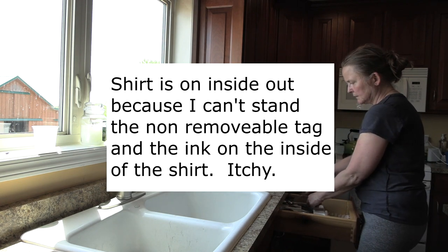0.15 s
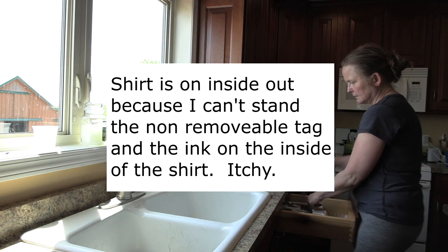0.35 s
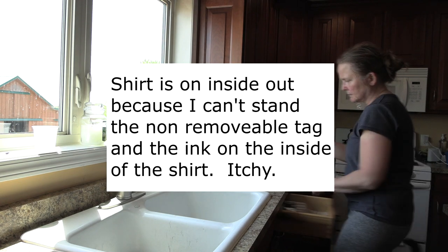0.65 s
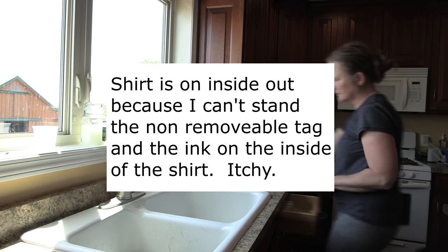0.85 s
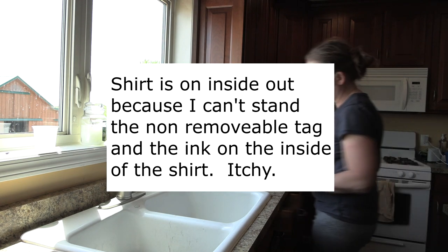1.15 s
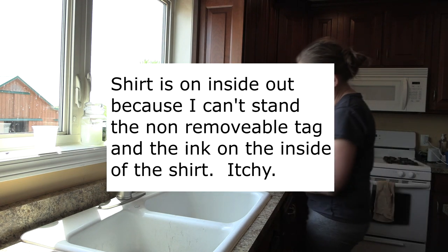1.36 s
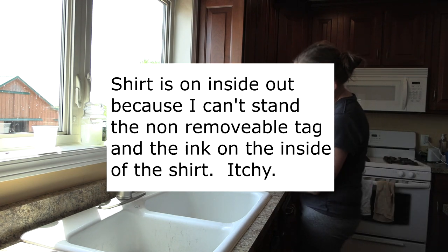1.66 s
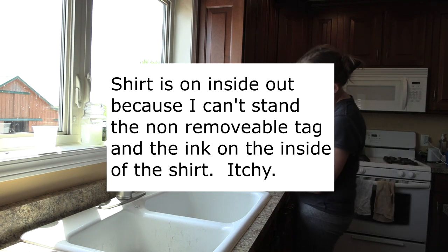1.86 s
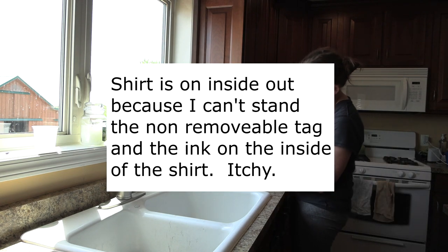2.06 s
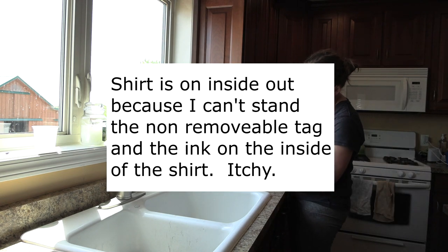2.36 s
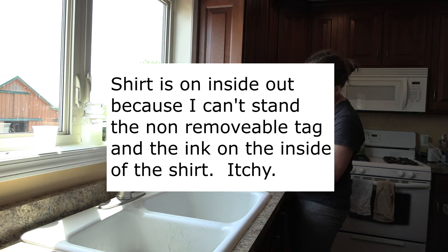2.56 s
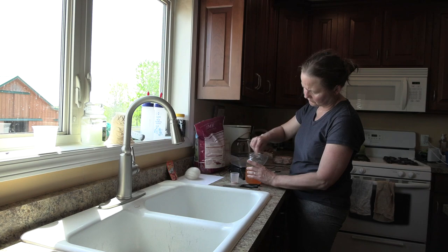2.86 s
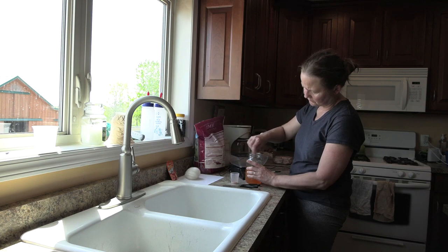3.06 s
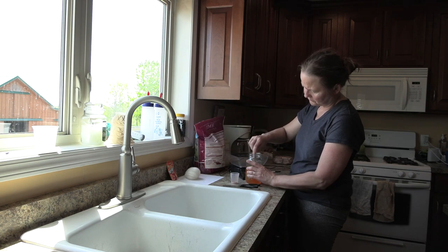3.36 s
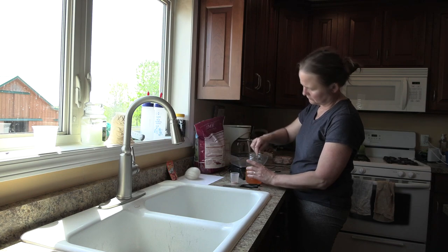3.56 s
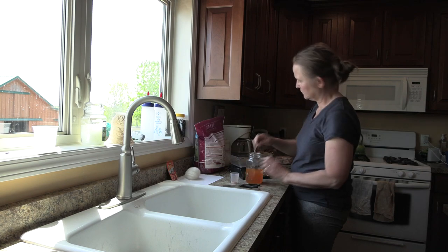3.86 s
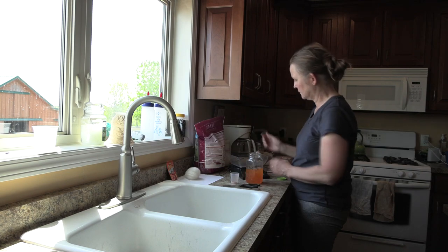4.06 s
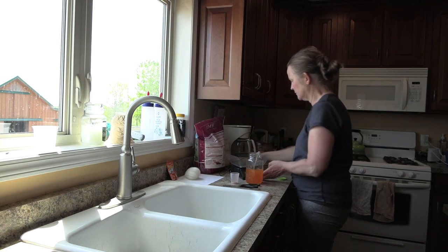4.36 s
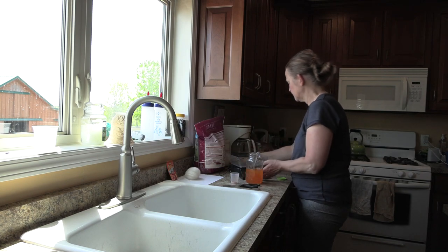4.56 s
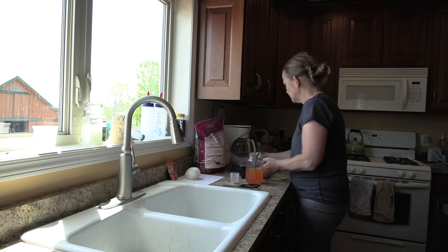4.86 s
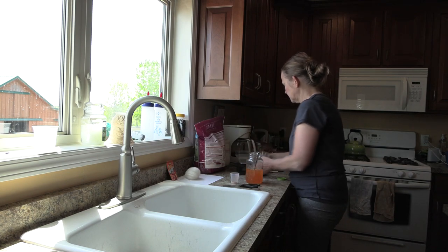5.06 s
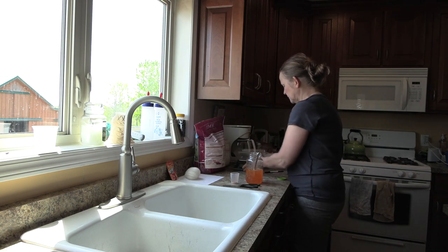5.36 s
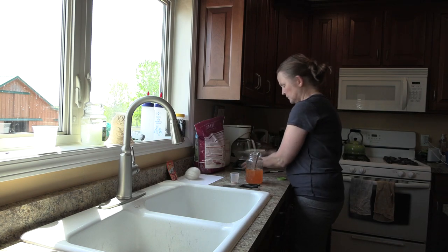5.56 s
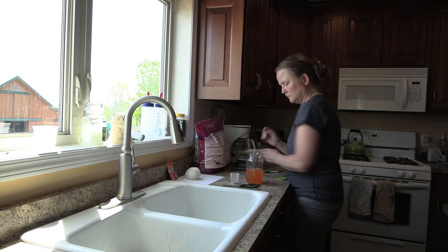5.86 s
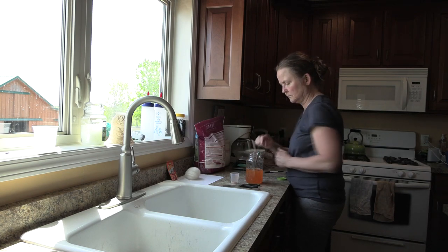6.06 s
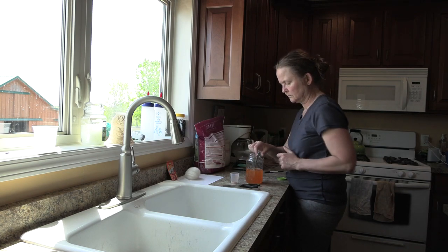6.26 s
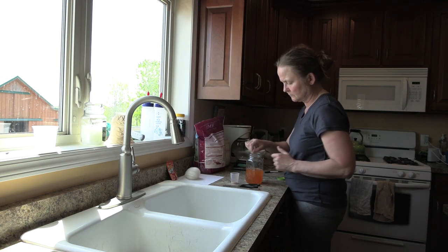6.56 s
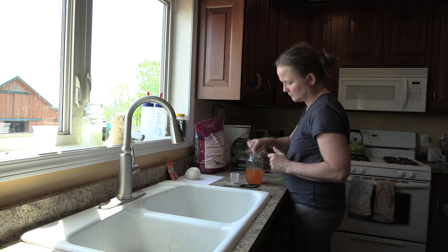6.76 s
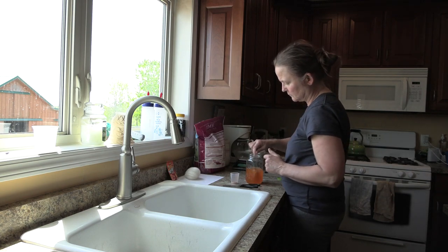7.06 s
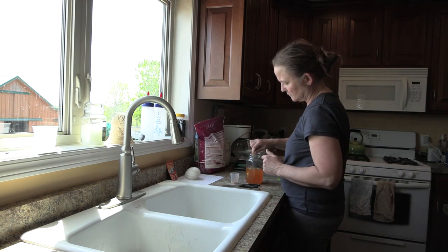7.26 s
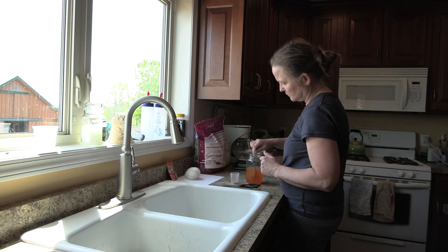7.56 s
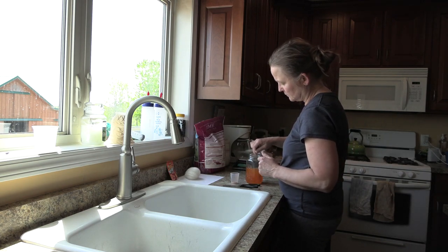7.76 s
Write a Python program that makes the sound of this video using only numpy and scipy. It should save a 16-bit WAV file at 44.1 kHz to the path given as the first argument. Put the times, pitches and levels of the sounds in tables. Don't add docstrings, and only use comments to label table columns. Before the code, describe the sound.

Kitchen counter, stereo microphone a few steps off, left side louder, faint fridge hum throughout. First come jolting forks and spoons in a wooden drawer, then low rolling and small bumps. Next, rapid uneven spoon knocks ring in a partly filled glass jar, some with tiny bounces or scrapes. After a few fading nudges a bag slides with a dry hiss and snap. A pause, one clink, then renewed bright stirring with short reverberant tails.

```python
import sys
import numpy as np
from scipy import signal
from scipy.fft import rfft, irfft, next_fast_len
from scipy.io import wavfile
from scipy.ndimage import uniform_filter1d

SR = 44100
rng = np.random.default_rng(int(sys.argv[2]) if len(sys.argv) > 2 else 0)


def transcribe(signal):
    frames = np.atleast_2d(signal).T
    limited = np.clip(frames, -1, 1)
    pcm = np.round(limited * 32767).astype(np.int16)
    wavfile.write(sys.argv[1], SR, pcm)


def undo_db(level):
    steps = np.asarray(level, float) / 20
    return 10 ** steps


N = 348831

# (frequency [Hz], level [dB])
WEAK_MODES = [(1995, -9), (2100, -5.5), (2180, -8), (2505, -20.5), (2570, -6.5), (2780, -2), (2920, -11.5),
              (3330, -23.5), (4050, -17), (4120, -5), (4510, -9.5), (4597, -6),
              (4810, -7), (4985, -4), (5120, -5), (5415, -1), (5620, -32.5), (5740, -4.5), (6340, -6.5),
               (6800, -5), (7120, -5.5), (7790, -10), (8760, -13), (9860, -20.5), (11300, -32)]
MINOR_MODES = WEAK_MODES
# (frequency [Hz], density [dB per Hz])
CRACK = [(180, -61.5), (300, -17.5), (1750, -11), (2280, -17), (2740, -7), (5570, -8.5), (9760, -23),
         (15500, -57.5)]
# (frequency [Hz], density [dB per Hz])
RATTLE = [(1060, -39), (1800, -5.5), (3180, -5), (3910, 1.5), (6180, -3.5), (8870, -1.5), (11600, -7),
          (15500, -20.5)]
# (frequency [Hz], density [dB per Hz])
WOOD = [(200, -47.5), (518, -7.5), (882, -11.5), (977, -8.5), (1520, -9), (3000, -20.5), (3900, -39),
        (6600, -120)]
# (frequency [Hz], density [dB per Hz])
RUNNER = [(59, -46), (100, -34), (291, -6), (552, -9.5), (900, -15.5), (1800, -24.5), (3900, -34.5),
          (6600, -120)]
# (time [s], blow level [dB], ring frequency [Hz], ring level [dB], overtone level [dB])
STIR = [(1.42,-33,2130,-39.5,-43.5),(1.468,-17,2150,-42,-54.5),(1.68,-37,2260,-68,-62.5),(1.735,-14,2084,-34.5,-36.5),(1.973,-19.5,2063,-37,-44),(2.058,-20.5,2106,-29.5,-30),(2.121,-15,2160,-47,-33.5),(2.179,-9.5,1960,-34,-34),(2.37,-19.5,2000,-36.5,-39),(2.504,-18,2090,-42,-54.5),(2.542,-11,1967,-36.5,-21),(2.694,-25,1996,-34.5,-37.5),(2.74,-20.5,2056,-46,-40),(2.86,-20.5,2000,-33,-33.5),(2.894,-9,1962,-30.5,-35),(3.056,-25,2004,-32.5,-34),(3.103,-22.5,1900,-36,-34),(3.258,-9,1958,-35,-33),(3.433,-27,2017,-32.5,-38),(3.487,-27.5,2080,-42,-46.5),(3.55,-20,2000,-44,-32),(3.622,-10.5,1976,-30.5,-33),(3.754,-23.5,2163,-31,-35)]
# (time [s], blow level [dB], ring frequency [Hz], ring level [dB], overtone level [dB])
AGAIN = [(4.057,-19.5,2097,-37,-48),(4.13,-27.5,2098,-32,-34),(4.245,-47,2132,-30.5,-40.5),(4.275,-38,2110,-36,-42),(4.335,-52,2105,-49,-48),(4.537,-54,2080,-61,-69),(4.647,-54,2126,-58,-67),(4.941,-30.5,2175,-46,-56),(5.067,-34.5,2130,-45,-62),(5.135,-50,2070,-53,-69),(6.566,-24.5,2094,-35.5,-33),(6.938,-52,2040,-46,-65),(6.973,-30,2120,-39,-39.5),(7.05,-16,2142,-24,-35),(7.15,-23.5,2170,-37,-41),(7.312,-21,2130,-39,-51),(7.389,-25,2078,-28,-35),(7.426,-40,2100,-40,-35),(7.469,-19.5,2103,-44,-28),(7.546,-9.5,2064,-24.5,-32),(7.76,-20,2105,-27,-35),(7.857,-13.5,2000,-32,-29)]
KNOCKS = STIR + AGAIN
CLEAR_BEND = 1.51


def evened(x):
    return x / np.sqrt(np.mean(x ** 2) + 1e-20)


def read(points, hz):
    f, value = np.transpose(points)
    return np.interp(np.log(hz + 1), np.log(f + 1), value)


def add(mix, s, sound):
    part = mix[round(s * SR):][:len(sound)]
    part += sound[:len(part)]


def coloured(x, spectrum):
    size = next_fast_len(x.shape[-1])
    gain = undo_db(read(spectrum, np.fft.rfftfreq(size, 1 / SR)))
    return evened(irfft(rfft(x, size) * gain, size)[..., :x.shape[-1]])


def level(rows, column):
    rows = np.array(rows)
    return undo_db(np.interp(np.arange(N) / SR, rows[:, 0], rows[:, column], -150, -150))


def swell(s, db, rise_db_s, fall_db_s, hold_s=0):
    t = np.arange(0, N + 64, 64)[:, None] / SR - s
    gain = undo_db(db + rise_db_s * np.minimum(t, 0) - fall_db_s * np.maximum(t - hold_s, 0)).sum(1)
    return np.repeat(gain, 64)[:N]


def grains(per_s, spread_db):
    size = undo_db(spread_db * np.minimum(rng.exponential(1, N), 4))
    return evened(size * rng.choice([-1., 1.], N) * (rng.random(N) < per_s / SR))


def resonate(x, hz, width_hz):
    r = np.exp(-np.pi * width_hz / SR)
    return evened(signal.lfilter([1], [1, -2 * r * np.cos(2 * np.pi * hz / SR), r * r], x))


def ring(hz, db, t60, rise_s=0.00085, bend=1):
    t = np.arange(0, max(t60, .01), 1 / SR)
    envelope = undo_db(db - 60 * (t / t[-1]) ** bend) * (1 - np.exp(-t / rise_s))
    return envelope * np.sin(2 * np.pi * hz * t)


def cluster(hz, db, t60):
    ratios = 1 + 0.008 * rng.uniform([.4, -1], [1, -.4])
    neighbours = sum(ring(hz * ratio, db - 3.5, t60, bend=CLEAR_BEND) for ratio in ratios)
    return ring(hz, db, t60, bend=CLEAR_BEND) + neighbours


def burst(spectrum, db, t60):
    t = np.arange(3000) / SR
    envelope = undo_db(db - 60 * t / t60) * (1 - np.exp(-t / 0.0021)) ** 2
    return envelope * coloured(rng.standard_normal(len(t)), spectrum)


def pair(a, b):
    # (frequency [Hz], left-right likeness [0..1])
    likeness = [(60, 1), (180, 0.86), (550, 0.97), (1650, 0.88), (4970, 0.69), (15000, 0.47)]
    size = next_fast_len(len(a))
    same = np.clip(read(likeness, np.fft.rfftfreq(size, 1 / SR)), 0, 1)
    right = irfft(same * rfft(a, size) + np.sqrt(1 - same ** 2) * rfft(b, size), size)
    return np.array([a, right[:len(a)]])


def air():
    # (frequency [Hz], level [dB], width [Hz])
    hum = [(120, -63.5, 1.5), (278.7, -53, 5.4)]
    # (frequency [Hz], density [dB per Hz])
    room_tone = [(69, -22.5), (110, -10.5), (260, -3.5), (700, -12), (2000, -25.5), (8000, -36),
                 (13500, -47.5), (15800, -69)]
    a, b = rng.standard_normal((2, N))
    motor_hz, motor_db, _ = hum[0]
    steady = np.sqrt(2) * undo_db(motor_db) * np.sin(2 * np.pi * motor_hz * np.arange(N) / SR)
    waver = sum(undo_db(db - 10.5) * resonate(a, hz, width) for hz, db, width in hum)
    return undo_db(-53.5) * coloured(pair(a, b), room_tone) + steady + waver


def drawer():
    # (frequency [Hz], width [Hz], level [dB])
    chimes = [(3780, 33, 10), (4740, 53.4, 1), (5940, 98, 10), (7240, 89, 6.5), (8730, 40, -1),
              (9450, 38, -1), (11220, 42, -4)]
    # (time [s], rattle level [dB], wooden rumble level [dB])
    jolts = [
        (0,-31.5,-35),
        (.065,-30,-41),
        (0.107,-30.5,-42),
        (0.188,-22.5,-39),
        (0.226,-43,-31.5),
        (0.264,-29.5,-26.5),
        (.38,-48.5,-65.5),
    ]
    # (time [s], level [dB])
    bumps = [
        (.58,-51.5),
        (.7,-55),
        (.81,-60),
        (.92,-49),
        (1.04,-43.5),
        (1.19,-52.5),
        (1.41,-49),
    ]
    ticks = coloured(grains(6000, 2.0), RATTLE)
    chime = sum(undo_db(db) * resonate(grains(30, 3.8), hz, width) for hz, width, db in chimes)
    rattle = evened(ticks) + undo_db(-13) * evened(chime)
    rumble = coloured(grains(400, 1.0), WOOD)
    roll = coloured(grains(400, 0.91), RUNNER)
    s, rattle_db, rumble_db = np.transpose(jolts)
    shaken = swell(s, rattle_db, 462, 431.5) * rattle + swell(s, rumble_db, 462, 431.5) * rumble
    rolling = swell(*np.transpose(bumps), rise_db_s=143, fall_db_s=121) * roll
    return undo_db(-3) * shaken + undo_db(-2.5) * rolling


def cutlery():
    # (time [s], level [dB], frequency [Hz])
    pings = [(.08,-30,11330),(.082,-35,2890),(0.099,-26,8720),(.1,-33,12300),(.12,-33,3860),(.128,-31,8750),(0.175,-25.5,4770),(.18,-28,11250),(.185,-28,3830),(.2,-31,7130),(.265,-25.5,10900),(.266,-24.5,9500),(0.277,-30,7000),(.272,-31,4006)]
    out = np.zeros(N)
    for s, db, hz in pings:
        add(out, s, ring(hz, db, t60=0.05))
    return out


def bag():
    # (time [s], level [dB])
    slide = [
        (4.8,-56),
        (4.87,-47),
        (5.0,-34.5),
        (5.08,-43.5),
        (5.45,-44.5),
        (5.55,-53),
        (5.72,-67),
    ]
    # (frequency [Hz], density [dB per Hz])
    hiss_colour = [(290, -25), (500, 3.5), (655, -14), (1300, -2.5), (1680, -3), (6030, -13),
                   (11000, -20.5), (15000, -34)]
    # (time [s], level [dB])
    catches = [
        (4.83,-75),
        (4.96,-39.5),
        (5.2,-47),
        (5.45,-45),
        (5.62,-67),
    ]
    hiss = coloured(grains(6000, 4.7), hiss_colour)
    drag = coloured(grains(540, 2.2), RUNNER)
    dragging = swell(*np.transpose(catches), rise_db_s=143, fall_db_s=81) * drag
    return undo_db(-5.5) * level(slide, 1) * hiss + undo_db(-5.0) * dragging


def snaps():
    # (time [s], level [dB])
    clicks = [
        (0.1755,-9),
        (0.2651,-10),
        (.897,-52),
        (1.004,-30.5),
        (1.03,-29),
        (1.3882,-53),
        (4.808,-30),
        (5.221,-18),
        (5.5313,-29.5),
    ]
    out = np.zeros(N)
    hz = 3520
    colour = [(hz / 8, -14), (hz, 0), (hz * 3, -12), (hz * 6, -40)]
    for s, db in clicks:
        add(out, s, burst(colour, db - 6.5, 0.034))
    return out


def thuds():
    # (time [s], hollow note level [dB], its frequency [Hz], dull knock level [dB])
    hollow = [(.223,-27.5,505,-28),(0.265,-43,527,-50),(1.427,-23,698,-26),(1.467,-26,536,-21.5),(1.71,-19.5,567,-45),(1.973,-26,548,-27.5),(2.033,-23,629,-29.5),(2.506,-31,745,-36),(3.061,-33,632,-29.5),(3.437,-35.5,603,-55),(3.553,-31,724,-23.5),(3.622,-39,760,-34),(3.757,-31,577,-22),(4.059,-36.5,704,-26.5),(4.133,-33.5,545,-36),(4.272,-35.5,560,-34.5),(4.807,-47,764,-29),(5,-35,437,-59),(6.567,-35,545,-28),(7.056,-28.5,560,-55),(7.151,-28,712,-28.5),(7.393,-27,508,-21.5)]
    out = np.zeros(N)
    for s, db, hz, knock_db in hollow:
        mouth_t60 = 0.07 * (545 / hz) ** 1.8
        add(out, s, ring(hz, db + 0.5, mouth_t60, rise_s=0.0018))
        add(out, s, burst(WOOD, knock_db - 0.5, 0.029))
        add(out, s, burst(RUNNER, knock_db - 6.5, 0.058))
    return out


def scrape():
    # (time [s], level [dB], hold [s])
    strokes = [
        (1.428,-34,0.038),
        (3.768,-39,0.14),
        (4.098,-39.5,0.2),
        (7.373,-29,0.085),
    ]
    slips = grains(900, 3.5)
    glass = sum(undo_db(db) * resonate(slips, hz, 38) for hz, db in MINOR_MODES)
    s, db, hold_s = np.transpose(strokes)
    stroke = swell(s, db, 500, 159, hold_s)
    return undo_db(-10.0) * (coloured(slips, CRACK) + undo_db(-4.5) * evened(glass)) * stroke


def crash(blow_db):
    out = np.zeros(SR // 4)
    for place, more in rng.random((24, 2)):
        hz = 2400 * 4.2 ** place
        add(out, 0, ring(hz, blow_db - 9.5 - 9 * place - 8 * more, 0.037))
    return out


def chatter(sound):
    gap, loss = rng.random((2, 3))
    train = np.zeros(2000)
    train[0] = 1
    train[np.cumsum(120 + 500 * gap).astype(int)] = undo_db(-13.5 - 18.0 * loss)
    return signal.oaconvolve(sound, train)


def jar_knocks():
    out = np.zeros(N)
    for s, blow_db, *_ in KNOCKS:
        knock = np.zeros(SR // 2)
        add(knock, 0, burst(RATTLE, blow_db + 0.5, 0.013))
        add(knock, 0, crash(blow_db))
        add(knock, 0, burst(CRACK, blow_db + 3.0, 0.016))
        for hz, db in MINOR_MODES:
            more, detune = rng.standard_normal(2)
            t60 = 0.057 * (2000 / hz) ** 0.47
            add(knock, 0, ring(hz * (1 + 0.013 * detune), blow_db + db - 6.5 + 3 * more, t60))
        add(out, s, chatter(knock))
    return out


def clear_notes():
    # (time [s], level [dB], frequency
    # [Hz])
    lone = [(1.469,-24,5910),(1.973,-22,5780),(1.973,-32.5,2690),(2.12,-23,7130),(2.179,-18,5128),(2.896,-15,6810),(3.488,-40.5,1583),(3.626,-23,3420),(3.754,-30.5,1650),(3.77,-35,3350),(3.86,-43,3345),(4.059,-22,3330),(4.057,-35,5146),(4.94,-34.5,9820),(4.13,-37,3310),(6.571,-29.5,3860),(6.566,-33,2700),(6.61,-35,2900),(1.735,-25.5,5760),(1.735,-26.5,2900),(1.6,-34,4400),(1.468,-28.5,4000),(3.487,-38,1731),(3.754,-37,1284),(7.44,-36,1500),(7.76,-41,1350),(7.6,-22,5418),(3,-37,3685),(3.103,-32,2772),(7.313,-24.5,6392),(7.39,-31.5,1287),(7.858,-26.5,1932),
            (2.058,-25,4710),(2.121,-32,4048),(2.12,-33,4737),(2.179,-25,2945),(2.18,-23,4597),(2.179,-17,4694),(2.179,-27,4810),(2.505,-29,4646),(2.504,-17.5,4772),(2.504,-29,4869),(2.504,-31,8761),(2.542,-21,4869),(2.542,-24,4374),(2.86,-31,4794),(2.894,-28,2105),(2.895,-21,4514),(2.894,-21,4982),(2.895,-24,6089),(2.895,-24.5,6721),(3.258,-23,4869),(3.259,-25,3787),(3.433,-27,3626),(3.487,-34,2186),(3.55,-28,4912),(3.55,-32,2875),(3.622,-34,4901),(4.075,-24.5,2880),(4.057,-45,5800),(4.18,-41,2900),(4.27,-34,4180),(4.27,-38,3332),(4.32,-35,2900),(4.941,-39,4592),(4.941,-47,5289),(4.965,-34.5,2180),(4.989,-44,5300),(4.989,-54,7700),(5.066,-51,7058),(5.135,-45,3683),(6.566,-31,2011),(6.567,-33,5731),(7.05,-32,1925),(7.05,-28,4802),(7.049,-23,5416),(7.051,-29,5774),(7.149,-26,2990),(7.19,-37,4650),(7.39,-31,2509),(7.39,-30,4086),(7.389,-32,4802),(7.469,-27,2541),(7.469,-27,2202),(7.47,-27,4078),(7.546,-27,4689),(7.547,-25,5329),(7.548,-16,6815),(7.76,-24,1908),(7.857,-25,2920),(7.857,-22,4056),(7.856,-24,5469)]
    # (time [s], level [dB], frequency [Hz])
    rubbed = [
        (2.385,-33,2110),
        (3.79,-36,3332),
        (4.262,-29,2077),
        (4.32,-34,2132),
        (6.585,-30,2147),
        (7.416,-14.5,2117),
        (7.565,-20,2830),
        (7.575,-25,2062),
    ]
    # (time [s], level [dB], frequency [Hz])
    square = [
        (2.179,-18,2003),
        (2.542,-14.5,2000),
        (3.258,-18,2007),
        (7.312,-15.5,2099),
        (7.547,-15,5416),
        (7.05,-20,2918),
    ]
    # (time [s], level [dB])
    rim_low = [
        (2.542,-17),
        (2.893,-23),
        (3.257,-25),
        (3.056,-33),
    ]
    rim_high = [
        (3.622,-22.5),
        (4.055,-21),
        (4.132,-37),
        (6.564,-33),
        (7.051,-23),
        (7.857,-28),
    ]
    stem = [(1.468,-34.5),(1.735,-28),(2.179,-31),(2.371,-35),(2.542,-19),(2.86,-33),(2.895,-36),(3.056,-38),(3.103,-40),(3.258,-24),(3.433,-42),(3.623,-31),(4.057,-27),(4.13,-23.5),(4.17,-27.5),(4.245,-31),(4.298,-30),(4.648,-54.5),(4.941,-38),(5.066,-32.5),(6.973,-42),(7.05,-22),(7.15,-35),(7.313,-44),(7.394,-40),(7.47,-45),(7.549,-20.5),(7.858,-26)]
    neck = [
        (1.465,-33.5),
        (3.101,-44),
        (3.55,-38.5),
        (4.055,-26),
        (4.302,-46),
        (7.046,-30.5),
        (7.862,-29),
    ]
    bowl = [
        (2.121,-26.5),
        (2.543,-26),
        (2.894,-27),
        (3.258,-26.5),
        (3.434,-45),
        (3.623,-29),
        (4.94,-45),
        (6.972,-41.5),
        (7.393,-35),
        (7.471,-34),
    ]
    edge = [
        (2.059,-45),
        (2.179,-28),
        (2.505,-41),
        (2.86,-45),
        (7.545,-26),
    ]
    lip = [
        (1.736,-25.5),
        (2.371,-43),
        (2.693,-49),
        (2.861,-45),
        (3.259,-30),
        (3.624,-36),
        (7.469,-44),
        (7.549,-26),
    ]
    tip = [(1.735,-27.5),(2.058,-44),(2.182,-23.5),(2.542,-33),(3.551,-38),(6.568,-42),(7.048,-21.5),(7.148,-34),(7.394,-39),(7.76,-45),(7.86,-29)]
    out = np.zeros(N)
    for s, _, hz, db, over_db in KNOCKS:
        add(out, s, ring(hz, db + 2.5, 0.18, 0.0012, CLEAR_BEND))
        add(out, s, ring(hz - 11, db - 11.5, 0.18, 0.0012, CLEAR_BEND))
        over_hz = 2790 + 0.9 * (hz - 2000)
        add(out, s, cluster(over_hz, over_db - 0.6, 0.21))
    rim = [(s, db, 2500) for s, db in rim_low] + [(s, db, 2577) for s, db in rim_high]
    for s, db, hz in lone + rim:
        add(out, s, ring(hz, db - 3, 0.15 * (3000 / hz) ** 0.25, bend=CLEAR_BEND))
    for s, db, hz in rubbed:
        add(out, s, ring(hz, db, 0.22, 0.0075, CLEAR_BEND))
    for s, db, hz in square:
        add(out, s, ring(hz, db, 0.2, bend=CLEAR_BEND))
    for s, db in stem:
        add(out, s, ring(3683, db + 2.0, 0.2, 0.0029, CLEAR_BEND))
    split_modes = [(4135, neck, 2.5, .14), (4580, bowl, 2.5, .14), (5700, edge, 2.5, .13),
                   (5496, lip, 1.5, .18), (5610, tip, 0.6, .14)]
    for hz, touches, lift_db, t60 in split_modes:
        for s, db in touches:
            add(out, s, cluster(hz, db + lift_db, t60))
    return out


def grazed(x):
    sliding_in = [
        1.734,
        1.973,
        2.504,
        2.54,
        2.86,
        6.972,
        7.315,
        7.76,
    ]
    ahead_s = 0.0045
    window = swell(np.array(sliding_in) - ahead_s, -7, 9000, 602.5, ahead_s)
    return x + window * np.roll(x, -round(ahead_s * SR))


def fluttered(x, depth_db):
    z = signal.stft(x, nperseg=512, noverlap=384)[2]
    patches = rng.standard_normal(z.shape[-2:])
    for _ in range(2):
        patches = uniform_filter1d(patches, size=7, axis=1)
    gain = undo_db(depth_db * evened(uniform_filter1d(patches, size=2, axis=0)))
    return signal.istft(z * evened(gain), nperseg=512, noverlap=384)[1][..., :N]


def kitchen(x):
    # (frequency [Hz], t60 [s])
    decay = [(250, 0.47), (1000, 0.47), (4000, 0.5), (12000, 0.32)]
    taps = np.zeros((3, 2, SR))
    at = np.arange(120, SR - 20, 20) + rng.integers(0, 20, (3, 2, (SR - 121) // 20))
    np.put_along_axis(taps, at, rng.choice([-1., 1.], at.shape), 2)
    hz, t, z = signal.stft(taps, SR, nperseg=256)
    tails = signal.istft(z * undo_db(-60 * t / read(decay, hz)[:, None]), SR, nperseg=256)[1]
    turn = 2 * np.pi * 1.3 * np.arange(N) / SR
    wet = 0
    for k, tail in enumerate(tails):
        share = np.sqrt(2 / 3) * np.cos(turn + k * 2 * np.pi / 3)
        stereo_tail = pair(*tail) / np.linalg.norm(tail[0])
        wet = wet + signal.fftconvolve((x * share)[None], stereo_tail, axes=1)[:, :N]
    return wet


def scene():
    clatter = grazed(jar_knocks()) + scrape() + thuds() + drawer() + cutlery() + bag() + snaps()
    clear = grazed(clear_notes())
    echoes = fluttered(kitchen(undo_db(2.5) * clatter + undo_db(-5) * clear), depth_db=4.5)
    direct = undo_db(-1.5) * clatter + undo_db(-1.5) * fluttered(clear, depth_db=2.2)
    return direct + echoes + air()


def low_pass(x):
    return signal.sosfilt(signal.butter(12, 15730, fs=SR, output="sos"), x)


def record(dry):
    # (frequency [Hz], gain [dB])
    microphone = [(20, -12), (90, -2.5), (12000, 2), (14500, -5.5), (15800, -25.5)]
    # (frequency [Hz], left over right [dB])
    lean = [(60, 5), (6000, 6), (13000, 4.5)]
    size = next_fast_len(N)
    hz = np.fft.rfftfreq(size, 1 / SR)
    colour_db = read(microphone, hz) + np.outer([.5, -.5], read(lean, hz))
    x = irfft(rfft(dry, size) * undo_db(colour_db), size)[:, :N]
    return low_pass(np.clip(x, -.99, .99))


dry = scene()
out = record(dry)
transcribe(out)
```